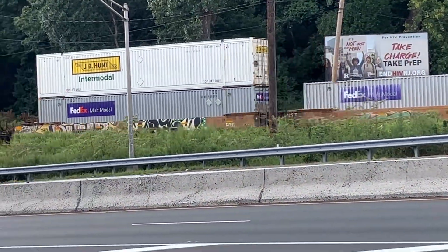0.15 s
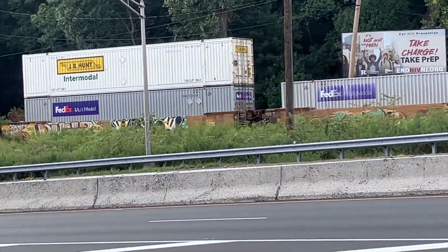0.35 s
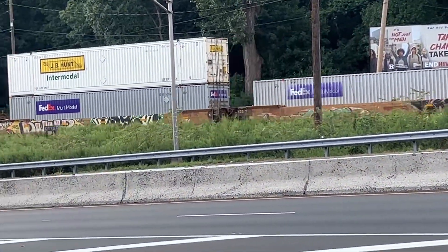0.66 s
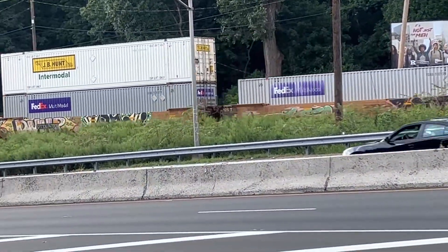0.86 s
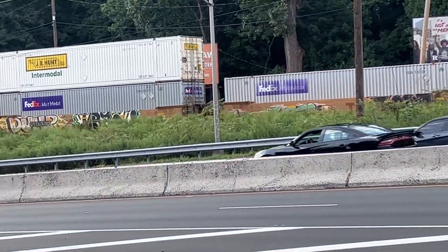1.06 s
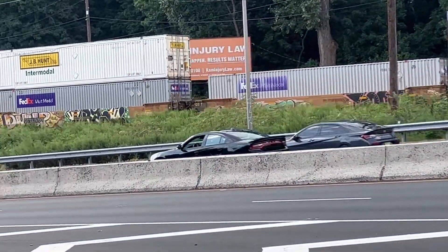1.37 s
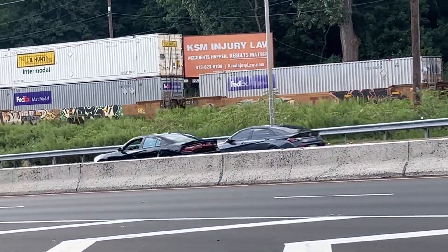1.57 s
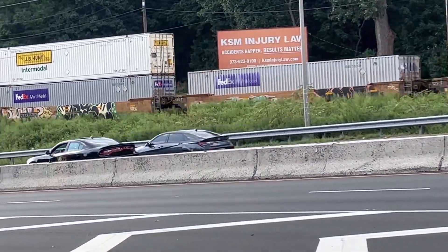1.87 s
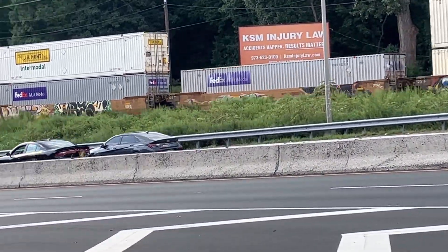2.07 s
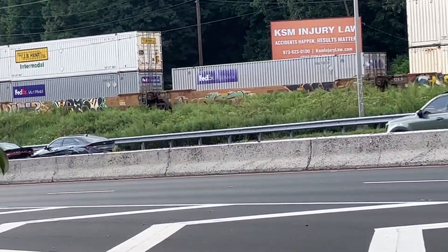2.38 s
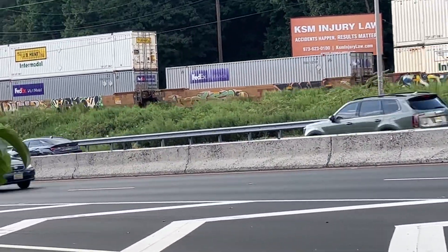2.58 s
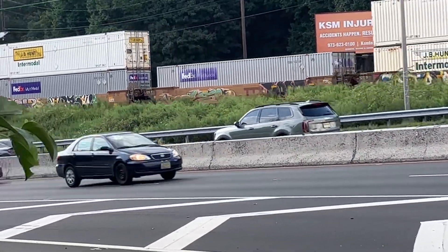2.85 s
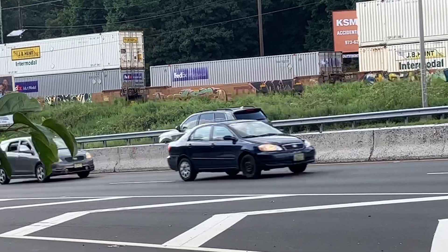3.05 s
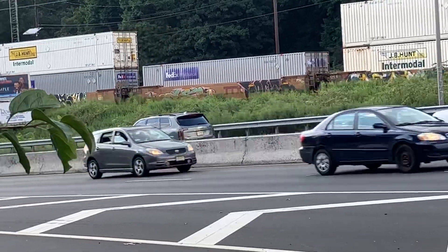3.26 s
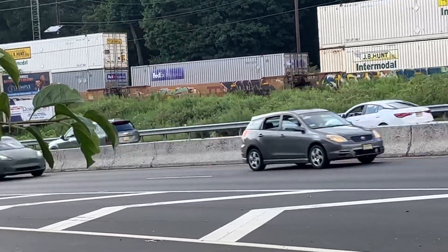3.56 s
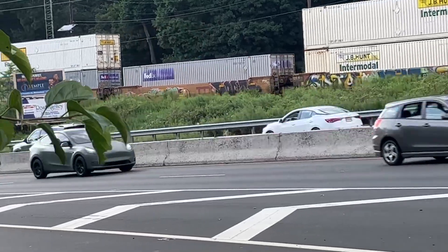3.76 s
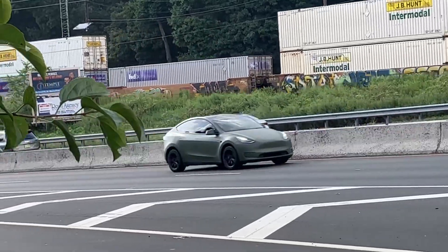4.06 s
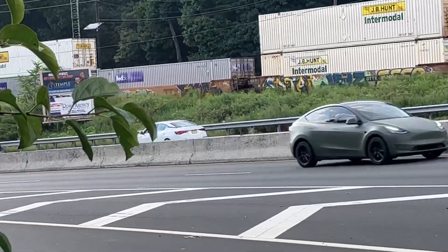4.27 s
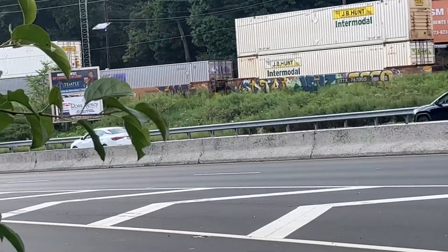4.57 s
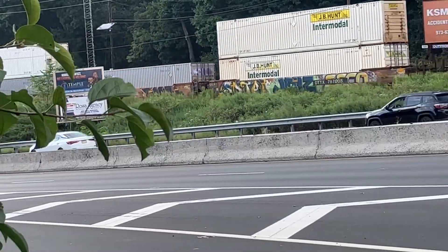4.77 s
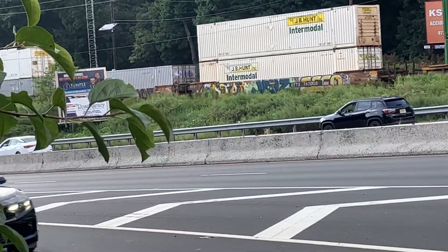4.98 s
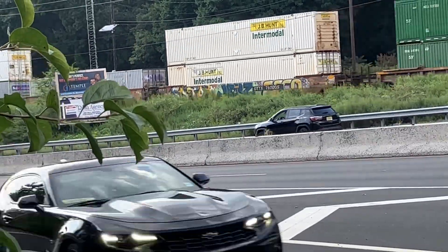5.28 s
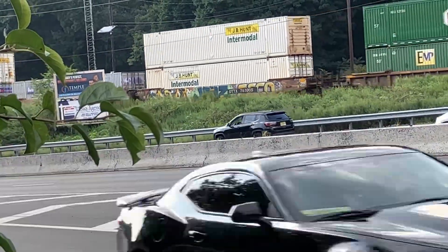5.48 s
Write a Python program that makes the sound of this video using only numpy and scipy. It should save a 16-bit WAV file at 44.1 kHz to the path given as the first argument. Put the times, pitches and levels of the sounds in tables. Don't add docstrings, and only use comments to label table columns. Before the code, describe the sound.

Steady tyre roar and low exhaust booms from passing cars, over a heavy train rumble with brief metallic wheel squeals and pings.

```python
import sys
import numpy as np
from scipy import signal
from scipy.fft import rfft, irfft, next_fast_len
from scipy.io import wavfile
from scipy.ndimage import uniform_filter1d

SR = 44100
rng = np.random.default_rng(int(sys.argv[2]) if len(sys.argv) > 2 else 0)


def pcm_store(signal):
    levels = np.round(np.clip(np.atleast_2d(signal), -1, 1) * 32767)
    wavfile.write(sys.argv[1], SR, levels.astype(np.int16).T)


def rack_gain(trim_db):
    fader = np.asarray(trim_db, float)
    return 10 ** (fader / 20)


N = 248283
T = np.arange(N) / SR


def unit(x):
    return x / np.sqrt(np.mean(x ** 2) + 1e-20)


def along(points, hz):
    point_hz, value = np.transpose(points)
    return np.interp(np.log(hz + 1), np.log(point_hz + 1), value)


def roar(spectrum, late_ms, patchy_db, direct=0.99, size=1024, bend=0):
    # pitch in Hz, likeness from 0 to 1.
    likeness = [(60, 0.99), (120, 0.96), (250, 0.97), (500, 0.62), (1000, 0.66), (1500, 0.62), (2200, 0.33),
                (4000, 0.29)]
    # pitch in Hz, likeness from 0 to 1.
    duct_likeness = [(5200, 0), (6200, 0.061), (7000, 0.62), (8000, 0.45), (9000, 0.59), (10000, 0.75),
                     (16000, 0.2)]
    # pitch in Hz, cycles the left port gains.
    shadow = [(1200, 0), (1450, .08), (1700, .27), (2000, .6), (2400, 1.2), (2800, 1.6)]
    duct_hz = 5600

    hz, t, z = signal.stft(rng.standard_normal((3, N)), SR, nperseg=size)
    chance = rng.standard_normal((2,) + z.shape[1:])
    broad = uniform_filter1d(uniform_filter1d(chance[0], size=10, axis=0), size=6, axis=1)
    streaks = uniform_filter1d(uniform_filter1d(chance[1], size=2, axis=0), size=16, axis=1)
    patches_db = patchy_db * (unit(broad) + 0.86 * unit(streaks))

    share = np.where(hz < duct_hz, direct * along(likeness, hz), along(duct_likeness, hz))
    share = np.clip(share, 0, 1)[:, None]
    turn = bend * along(shadow, hz)[:, None] - hz[:, None] * late_ms(t) / 1000
    delay = np.exp(1j * np.pi * (hz < duct_hz)[:, None] * turn)
    ports = np.sqrt(share) * z[0] * np.array([delay, 1 / delay]) + np.sqrt(1 - share) * z[1:]
    ports = ports * rack_gain(along(spectrum, hz)[:, None] + patches_db)
    return unit(signal.istft(ports, SR, nperseg=size)[1][:, :N])


def resonant(x, hz, width_hz):
    m = next_fast_len(x.shape[-1] + 8192)
    f = np.fft.rfftfreq(m, 1 / SR)
    mode = 1j * f * width_hz / (hz * hz - f * f + 1j * f * width_hz)
    return irfft(rfft(x, m) * mode ** 2, m)[..., :x.shape[-1]]


def echoes(x, t60, wet_db):
    t = np.arange(SR // 2) / SR
    tail = rng.standard_normal((2, len(t))) * rack_gain(-60 * t / t60) * (t > .02)
    return x + rack_gain(wet_db) * signal.fftconvolve(x, tail / np.linalg.norm(tail[0]), axes=1)[:, :N]


def train():
    # time in seconds, weight of the wagons in dB, rolling of their wheels in dB.
    wagons = [(0, -23, -32), (.3, -18, -28.5), (.7, -20.5, -30), (1.0, -20.5, -32), (1.3, -23, -32),
              (1.55, -20.5, -32), (1.9, -20.5, -30), (2.2, -17.5, -28.5), (2.5, -19.5, -29),
              (2.7, -21.5, -30.5), (2.9, -19, -32), (3.4, -20.5, -33.5), (3.9, -19, -30),
              (4.25, -21.5, -29), (4.5, -21.5, -32), (4.9, -22, -32), (5.2, -20.5, -32), (5.63, -23, -25)]
    # pitch in Hz, level in dB per Hz.
    rumble_tone = [(10, -88), (24, -33), (31, -15), (40, -15.5), (50, -3), (63, -2), (84, -0.5),
                   (105, -0.5), (125, -7), (160, -10), (220, -24), (400, -120)]
    # pitch in Hz, level in dB per Hz.
    rolling_tone = [(40, -120), (110, -56), (160, -8.5), (220, 0), (300, -5), (450, -11.5), (700, -16.5),
                    (1200, -26), (2500, -29.5), (4000, -38.5), (8000, -120)]
    # pitch in Hz, level in dB per Hz.
    hiss_tone = [(600, -120), (1500, -33), (2500, -4.5), (4000, -7.5), (5200, -14), (7000, -14),
                 (8300, -17), (10000, -19), (12000, -27), (15000, -36), (16000, -32)]
    # middle in seconds, level in dB, half length in seconds.
    rubs = [(0, -43, 0.072), (0.426, -43, 0.058), (.6, -42, 0.43), (1.896, -47, 0.26), (2.7, -43, 0.56),
            (3.43, -40, 0.21), (3.803, -37.5, 0.24), (4.5, -39.5, 0.59), (5.6, -37.5, 0.32)]

    rumble = roar(rumble_tone, lambda t: 0.076 + 0 * t, patchy_db=-0.24, size=4096)
    rolling = roar(rolling_tone, lambda t: 0.26 + 0 * t, patchy_db=0.7, size=2048)
    hiss = roar(hiss_tone, lambda t: 0.24 + 0 * t, patchy_db=2.5, direct=0.97)

    seconds, weight_db, rolling_db = np.transpose(wagons)
    weight_db = np.interp(T, seconds, weight_db)
    rolling_db = np.interp(T, seconds, rolling_db)
    swing_db = rolling_db - rolling_db.mean()
    rubbing = sum(rack_gain(db) ** 2 * np.exp(-((T - s) / half_s) ** 2) for s, db, half_s in rubs)
    rail = np.sqrt(rack_gain(-48 + 0.68 * swing_db) ** 2 + rubbing)
    return rack_gain(weight_db + 0.5) * rumble + rail * hiss + rack_gain(rolling_db + 4.5) * rolling


def squeal(grips, wheel):
    attack_s, release_db_per_s, length_s = 0.016, 400, 0.47
    start = round(grips[0][0] * SR)
    t = T[start:start + round(length_s * SR)]
    efforts = []
    for s, db, held_s in grips:
        since_release = np.maximum(t - s - attack_s - held_s, 0)
        efforts.append(np.clip((t - s) / attack_s, 0, 1) * rack_gain(db - release_db_per_s * since_release))
    effort = np.max(efforts, axis=0)

    out = np.zeros((2, N))
    for hz, width_hz, db, pan_db in wheel:
        slip = rng.standard_normal((4, len(t)))
        bursts = rack_gain(2.1 * unit(resonant(slip[3], 22, 30)))
        drift = np.cumsum(unit(resonant(slip[2], 40, 60))) * width_hz * .38 / SR
        tone = unit(bursts * np.sin(2 * np.pi * (hz * t + drift)))
        haze = .28 * unit(resonant(slip[:2], hz, 4.4 * width_hz))
        level = rack_gain(db + np.array([[.5], [-.5]]) * pan_db)
        out[:, start:start + len(t)] += effort * level * (tone + haze)
    return out


def squeals():
    # start in seconds, level in dB, time held in seconds.
    grips_1 = [(.335, -46.5, .04), (.38, -41.5, .045), (.45, -48, .015), (.51, -57, .02)]
    rim_grips_1 = [(.33, -44, .012), (.375, -43, .035), (.435, -46, .03), (.5, -52, .05), (.575, -51, .02)]
    grips_2 = [(3.635, -52, .02), (3.66, -46, .04), (3.71, -43, .115), (3.86, -49, .02)]
    rim_grips_2 = [(3.655, -47, .04), (3.75, -43, .012), (3.785, -40, .018), (3.87, -52, .03)]
    # pitch in Hz, width in Hz, level in dB, left minus right in dB.
    body_1 = [(4210, 90, -1, 0), (4620, 90, -3, 0), (4770, 90, -1, 0), (8300, 70, -14, 0),
              (8810, 70, -14, 0), (14000, 90, -22, 0)]
    rim_1 = [(6520, 80, -5, -9), (10300, 90, -15, 0), (11300, 130, -14, 0), (12800, 70, -17, 0)]
    body_2 = [(3930, 60, -1.5, -3), (4360, 35, 1, 0), (4500, 40, -6, -2), (13900, 200, -19, 0)]
    rim_2 = [(5840, 40, -3, -6), (7260, 40, -14, 0), (7450, 50, -5, -2), (8550, 50, -12, 0),
             (9100, 70, -17, 0)]
    first = squeal(grips_1, body_1) + squeal(rim_grips_1, rim_1)
    second = squeal(grips_2, body_2) + squeal(rim_grips_2, rim_2)
    return first + second


def chirps():
    # start in seconds, level in dB, pitch in Hz, width in Hz, length in seconds.
    contacts = [(.206, -44, 6760, 260, .013), (.352, -47, 8300, 200, .045), (.585, -45, 4550, 350, .035),
                (.46, -43, 1860, 90, .12), (.58, -44, 1880, 100, .1), (.68, -43, 1870, 100, .16),
                (.575, -53, 6680, 150, .03), (1.09, -58, 11200, 400, .03), (1.588, -37, 8600, 350, .014),
                (1.602, -51, 8700, 450, .03), (1.588, -56, 11500, 250, .008),
                (1.608, -66, 11500, 250, .008), (1.925, -44, 8750, 450, .022), (2.04, -52, 8800, 400, .09),
                (2.33, -48, 4350, 200, .03), (2.42, -49, 8350, 150, .08), (2.46, -49, 4800, 200, .03),
                (2.63, -53, 6600, 200, .06), (2.8, -52, 6950, 250, .03), (3.44, -46, 6800, 500, .04),
                (3.45, -49, 5900, 300, .04), (3.46, -48, 8600, 500, .04)]
    out, t = np.zeros((2, N)), T[:SR // 4]
    for s, db, hz, width_hz, length_s in contacts:
        slip = rng.standard_normal((3, len(t)))
        contact = (1 - np.exp(-t / 0.0033)) * np.exp(-(t / length_s) ** 2)
        ringing = resonant(slip[0] + 0.36 * slip[1:], hz, width_hz)
        burst = unit(contact * ringing) / np.max(unit(contact))
        start = round(s * SR)
        out[:, start:start + len(t)] += rack_gain(db) * burst
    return out


def wheels():
    return echoes(squeals(), t60=.3, wet_db=-13) + echoes(chirps(), t60=.8, wet_db=-8)


def booms(events, width):
    out, t = np.zeros((2, N + 2 * SR)), T[:2 * SR] - 1
    for s, db, hz, half_s in events:
        puffs = rng.standard_normal((3, len(t)))
        boom = unit(resonant(puffs[0] + 0.38 * puffs[1:], hz, width * hz))
        start = round(s * SR)
        out[:, start:start + len(t)] += rack_gain(db) * np.exp(-(t / half_s) ** 2 / 2) * boom
    return out[:, SR:SR + N]


def exhausts():
    # middle in seconds, level in dB, pitch in Hz, half length in seconds.
    pipes = [(0, -25, 157, 0.12), (.75, -28.5, 191, 0.18), (3.5, -25, 224, 0.14), (4.0, -25, 205, 0.33),
             (5.05, -27, 175, 0.28), (5.55, -33, 202, 0.21)]
    return booms(pipes, width=0.38)


def treads():
    # middle in seconds, level in dB, pitch in Hz, half length in seconds.
    hums = [(.4, -34.5, 452, .06), (.95, -33, 399, 0.054), (1.76, -41, 1096, 0.047),
            (2.05, -43.5, 1397, 0.13), (3.42, -37.5, 1257, 0.043), (3.52, -37, 1100, .05),
            (3.62, -36, 1320, 0.045), (4.3, -40, 807, 0.12), (5.2, -33, 1410, 0.052),
            (5.28, -35, 1364, 0.024), (5.37, -32.5, 1470, 0.031), (5.47, -32, 1260, .03),
            (5.5, -33.5, 669, 0.073), (5.42, -33, 1410, .025), (5.46, -33, 1620, .03),
            (5.53, -34, 1197, .04), (5.55, -32, 1730, .05), (5.6, -33, 1680, .03), (5.58, -28, 866, 0.047)]
    return booms(hums, width=0.042)


def convoy(group, t, facing):
    ports_ms, fall_db = 0.47, 14
    s, db, scale_s = np.transpose(group)[:, :, None]
    past = (t - s) / scale_s
    power = rack_gain(db - fall_db * np.log10(1 + past ** 2)) ** 2
    total = power.sum(axis=0)
    bearing = np.sum(power * np.arctan(past), axis=0) / total
    return total, ports_ms * np.sin(np.clip(bearing - facing, -np.pi / 2, np.pi / 2))


def cars(group, tyres, direct, facing, patchy_db, bend=0):
    def lag_ms(t):
        return convoy(group, t, facing)[1]

    loudness = np.sqrt(convoy(group, T, facing)[0])
    return loudness * roar(tyres, lag_ms, patchy_db=patchy_db, direct=direct, bend=bend)


def road():
    # time abreast in seconds, tyre roar in dB, distance over speed in seconds.
    leaving = [(-.6, -24.5, 0.27), (.55, -30.5, 0.76), (1.75, -32.5, 0.15)]
    passing = [(2.1, -34, 0.57), (2.75, -32.5, 0.49), (3.3, -30.5, 0.3), (3.75, -29, 0.22),
               (4.35, -28.5, 0.57), (5.05, -29.5, 0.26)]
    arriving = [(4.75, -46, 0.071), (5.25, -28, 0.17), (5.6, -22.5, 0.43)]
    # pitch in Hz, level in dB per Hz.
    far_tyres = [(150, -120), (350, -42), (600, 4), (900, 2.5), (1300, 1), (2000, -5), (3000, -19),
                 (5000, -18.5), (9000, -58), (16000, -65)]
    middle_tyres = [(150, -120), (350, -15.5), (600, 2), (950, 4.5), (1150, 1.5), (1500, 3), (2000, -1),
                    (3000, -7.5), (4500, -15.5), (7000, -20.5), (12000, -38.5), (16000, -45)]
    near_tyres = [(200, -120), (450, -70), (680, -1), (770, -3.5), (880, -0.5), (1100, -4), (1480, 1),
                  (2000, -6), (3000, -15), (4500, -19.5), (6000, -35), (11000, -36.5), (16000, -37)]
    far = cars(leaving, far_tyres, direct=0.89, facing=-1.14, patchy_db=2.04, bend=1)
    middle = cars(passing, middle_tyres, direct=0.95, facing=0.031, patchy_db=1.19)
    near = cars(arriving, near_tyres, direct=1.06, facing=-0.16, patchy_db=0.07)
    return far + middle + near


def scene():
    return train() + wheels() + exhausts() + treads() + road()


def gapped(x, gaps, relief):
    edge_hz = 130
    spared_db = 15
    ping_s, ringing_s = 1.578, .62
    hz, t, z = signal.stft(x, SR, nperseg=2048)
    loud = np.log(np.sum(abs(z[hz > 8000]) ** 2, axis=0) + 1e-12)
    loud = relief * unit(loud - np.mean(loud))

    near = uniform_filter1d(abs(z) ** 2, size=9, axis=0)
    near = near / (np.median(near, axis=1, keepdims=True) + 1e-30)
    plain = near < rack_gain(spared_db) ** 2 * np.maximum(1, np.median(near[hz > 8000], axis=0))
    plain = plain & (abs(t - ping_s) > .02)
    ringing_band = (hz[:, None] > 8300) & (hz[:, None] < 8900)
    plain = plain & ~(ringing_band & (t > ping_s) & (t < ping_s + ringing_s))

    for low_hz, high_hz, share, yields in gaps:
        luck = uniform_filter1d(rng.standard_normal((3, len(t))), size=3, axis=1)
        low = low_hz + edge_hz * np.round(2 * luck[0] + yields * loud)
        high = high_hz + edge_hz * np.round(2 * luck[1])
        chance = luck[2] + loud
        empty = chance <= np.quantile(chance, share)
        z = z * ~((hz[:, None] > low) & (hz[:, None] < high) & empty & plain)
    return signal.istft(z, SR, nperseg=2048)[1][:N]


def band_limit(x):
    return signal.sosfilt(signal.butter(12, 15750, fs=SR, output="sos"), x)


def record(dry):
    # pitch in Hz, left minus right in dB.
    shell = [(60, 0.4), (110, -0.2), (200, 0), (380, 1), (700, -1), (1290, 1.5), (2380, 4), (4400, 0),
             (8120, -1.5), (15000, 5)]
    # pitch in Hz, cycles early.
    port_turn = [(7000, 0), (8000, .27), (9000, .48), (10000, .65), (11500, 1), (13500, 1.5), (15500, 2)]
    # pitch in Hz, extra level of the difference in dB.
    opposed = [(7600, 0), (8300, -1), (9000, 3.5), (9700, -2), (10400, 0), (12500, 0), (14500, -2)]
    # low edge in Hz, high edge in Hz, share of moments emptied,
    # steps the low edge yields to loud treble.
    sum_gaps = [(5050, 5250, .08, 0), (5950, 6100, .05, 0), (8450, 9650, 1, .5), (12600, 14450, 1, 5),
                (14300, 15100, .5, 1), (15100, 16000, .84, 1)]
    difference_gaps = [(6950, 7500, .55, 1), (10550, 12400, 1, 1), (15000, 16000, 1, 1)]

    m = next_fast_len(N + 4096)
    hz = np.fft.rfftfreq(m, 1 / SR)
    left, right = rfft(dry, m) * rack_gain(along(shell, hz) * np.array([[.5], [-.5]]))
    right = right * np.exp(2j * np.pi * along(port_turn, hz))
    both = irfft(left + right, m)[:N] / 2
    apart = irfft((left - right) * rack_gain(along(opposed, hz)), m)[:N] / 2
    both = gapped(both, sum_gaps, relief=.22)
    apart = gapped(apart, difference_gaps, relief=-.15)
    return band_limit(np.array([both + apart, both - apart]))


dry = scene()
out = record(dry)
pcm_store(out)
```